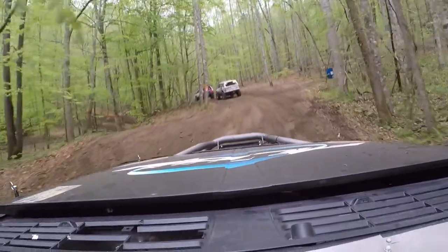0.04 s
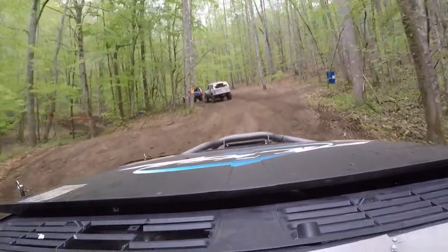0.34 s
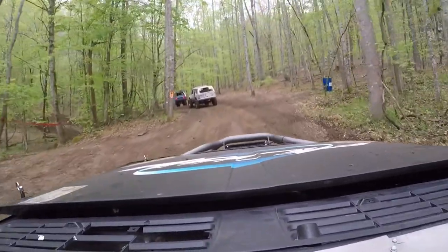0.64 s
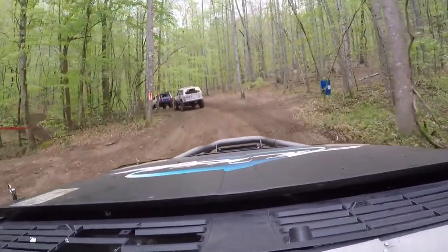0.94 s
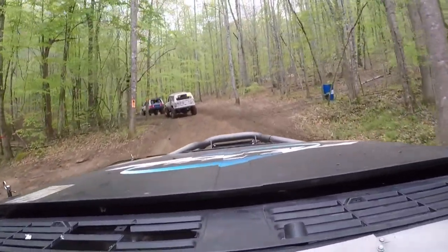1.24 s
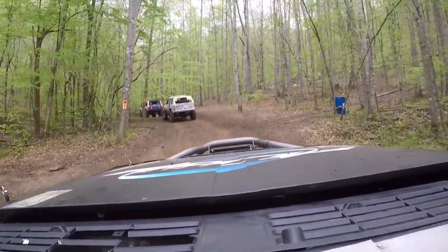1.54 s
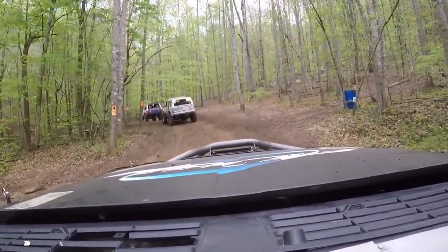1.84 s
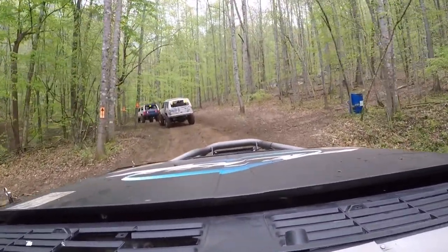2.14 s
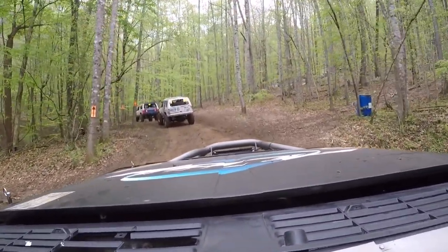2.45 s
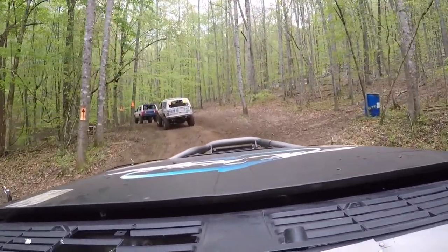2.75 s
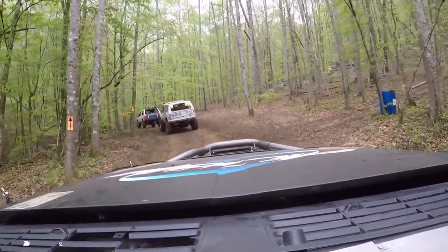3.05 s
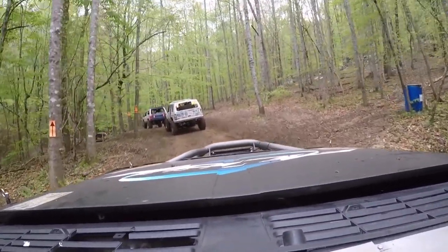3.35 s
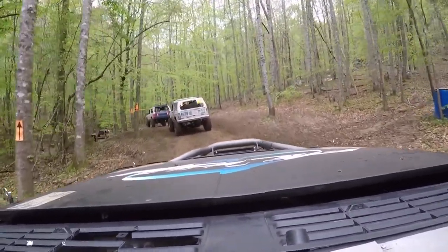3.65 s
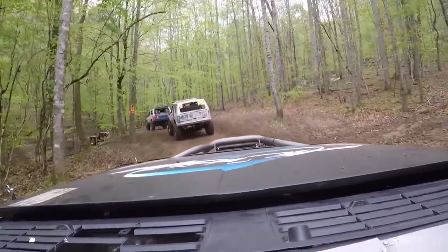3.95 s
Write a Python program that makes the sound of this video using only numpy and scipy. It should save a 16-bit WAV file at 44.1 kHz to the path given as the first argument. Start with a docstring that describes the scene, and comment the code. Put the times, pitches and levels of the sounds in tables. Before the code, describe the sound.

An off-road vehicle's engine drones and rumbles, heard from on board on a dirt trail. It eases almost to idle, then revs up sharply and keeps pulling, with faint tyre hiss, a few light rattles and low bumps.

```python
"""Off-road vehicle on a dirt trail

A six-cylinder engine, heard from the vehicle's own body, drones, sags almost to idle, then revs
and pulls. Its periodic firing gives a harmonic series that booms in the resonant bodywork, while
irregular combustion and rough ground add a rumble. Above these lie the hiss of engine bay and
tyres, a rasp of intake, a faint whine, a few rattles and one suspension thud."""
import sys
import numpy as np
from scipy import signal
from scipy.fft import rfft, irfft
from scipy.io import wavfile
from scipy.ndimage import uniform_filter1d

SR = 44100
rng = np.random.default_rng(int(sys.argv[2]) if len(sys.argv) > 2 else 0)


def bounce(signal):
    """Save signal as a 16-bit WAV file at the path given by the first command-line argument."""
    frames = np.transpose(np.atleast_2d(signal))
    limited = np.clip(frames, -1, 1)
    pcm = np.round(limited * 32767).astype(np.int16)
    wavfile.write(sys.argv[1], SR, pcm)


N = 176400

# Engine speed: time_s, firing_hz
FIRING_RATE = [(0, 65.44), (.2, 67.43), (.53, 63.6), (.78, 66.5), (1, 67.23), (1.25, 63.4), (1.5, 57.72),
               (1.7, 54.05), (1.85, 51.63), (2.08, 53.61), (2.3, 51.93), (2.43, 50.8), (2.5, 58.26),
               (2.6, 83.18), (2.66, 99.9), (2.76, 105.8), (3.03, 111.2), (3.15, 105.8), (3.3, 98.5),
               (3.78, 100.9), (3.92, 97.5), (4, 93.5)]
# Firing harmonics 1 to 4, each booming and fading: time_s, level_db
HARMONIC_1 = [(0, -22.5), (.55, -24.5), (1, -23.5), (1.45, -22), (1.65, -29.5), (2.16, -33), (2.24, -22),
              (2.48, -24), (2.68, -19.5), (2.85, -26), (3.02, -20.5), (3.15, -35), (4, -31)]
HARMONIC_2 = [(0, -18.5), (1.1, -18.5), (1.502, -19), (1.8, -26.5), (2.1, -21.5), (2.3, -24.5), (2.66, -22),
              (3.15, -20.5), (3.33, -32), (3.75, -31), (4, -32)]
HARMONIC_3 = [(0, -30), (.3, -30), (.53, -42), (.72, -32), (1, -31), (1.35, -46), (1.52, -31), (1.66, -31),
              (1.8, -22), (2.4, -22.5), (2.55, -40), (3, -52), (3.4, -38), (3.88, -31), (4, -41)]
HARMONIC_4 = [(1.33, -62), (1.43, -37), (1.53, -24.5), (1.85, -31), (2.4, -31.5), (2.6, -51.5)]
# Orders of unequal cylinders under load, ahead of the muffler: crank_order, level_db
UNEVEN_ORDERS = [(2, -43), (4, -33), (5, -32.5), (7, -32), (7.5, -35), (8, -38), (10, -38)]
# Spectra of exhaust rumble and bodywork boom: frequency_hz, relative_db
RUMBLE_SPECTRUM = [(10, -22), (28, -6.5), (50, -0.5), (80, -6), (120, -7.5), (158, -1.5), (188, -8),
                   (225, -7), (255, -15), (290, -21.5), (400, -29)]
BOOM_SPECTRUM = [(70, -32), (92, -10.5), (106, -7.5), (128, 1.5), (142, -0.5), (156, -15.5), (200, -36.5)]
# Envelopes of rumble, boom, intake rasp and intake whistle: time_s, level_db
RUMBLE_ENVELOPE = [(0, -25.5), (.6, -29), (1.3, -33), (2.05, -33), (2.5, -27), (2.9, -30.5), (3.55, -32),
                   (3.97, -23)]
BOOM_ENVELOPE = [(1.4, -40), (1.65, -27.5), (2.35, -29), (2.53, -22), (2.7, -22), (3.1, -25.5), (3.48, -28),
                 (4, -24.5)]
RASP_ENVELOPE = [(2.47, -62), (2.64, -43.5), (2.8, -44), (2.96, -41.5), (3.22, -54), (3.8, -50)]
WHISTLE_ENVELOPE = [(1.6, -61), (2.9, -56.5), (3.6, -49), (4, -48.5)]
# Envelopes of the three hiss bands: time_s, mids_db, upper_mids_db, treble_db
HISS_ENVELOPES = [(0.1, -45.5, -46, -70), (1.67, -44.5, -47, -66), (1.9, -42, -45, -63),
                  (2.4, -43, -44, -59.5), (2.56, -35.5, -42.5, -58), (2.68, -40, -44.5, -59.5),
                  (3.26, -42.5, -45, -64), (3.84, -39.5, -40, -60)]
# Spectra of those bands: frequency_hz, relative_db
HISS_MIDS = [(200, -8.5), (300, -2), (600, -1.5), (800, -3.5), (1300, -3.5), (1600, -11.5), (2500, -27)]
HISS_UPPER_MIDS = [(800, -17.5), (1500, -1.5), (2400, -1.5), (3200, -6.5), (4000, -10), (5000, -14.5),
                   (6100, -12), (6600, -23), (7200, -37), (9000, -54.5)]
HISS_TREBLE = [(5000, -1.5), (6500, 10), (7600, 0.5), (9000, -1.5), (10300, -6.5), (11500, -14),
               (13000, -38.5)]
# Drive whine: time_s, pitch_hz, level_db
DRIVE_WHINE = [(0, 492, -57.5), (1.8, 494, -54), (2.03, 523, -46.5), (2.2, 530, -47), (2.6, 530, -46),
               (2.8, 546, -52), (4, 538.5, -59.5)]
# Short rattles of loose fittings and one longer, low suspension thud:
# start_s, ring_hz, width_octaves, level_db, decay_s
RATTLES_AND_THUD = [(.232, 3200, .6, -43, .007), (.233, 6250, .07, -46, .007), (.252, 6300, .07, -51, .007),
                    (.27, 430, .7, -45, .2), (.595, 2250, .55, -39, .012), (2.548, 2100, .4, -35, .013),
                    (2.549, 6250, .1, -43.5, .016), (2.59, 1600, .2, -35, .018)]
# Booms as the wheels roll over bumps: peak_s, pitch_hz, level_db
BUMP_BOOMS = [(2.55, 138, -19), (3.375, 127, -22), (3.58, 127, -19), (3.715, 113, -21), (3.79, 133, -20)]
# Panel resonances: centre_hz, lift_db
PANEL_MODES = [(380, 4), (484, 3), (690, 3.5), (778, 7.5), (970, 4.5), (1295, 2), (1520, 1), (2110, 4),
               (2390, 2), (2545, 1.5), (2920, 4), (3450, 1.5), (3800, 2)]

BODY_MODES_HZ, BODY_WIDTH_HZ, PANEL_Q = (120, 143, 180, 213), 5, 29
FIRINGS_PER_TURN = 3
TIME_S = np.arange(N) / SR


def amp(db):
    """Amplitude ratio of a level in decibels."""
    return 10 ** (np.asarray(db) / 20)


def unit(x):
    """Normalisation to rms 1."""
    return x / np.sqrt(np.mean(x ** 2) + 1e-20)


def bell(x, centre, width):
    """Gaussian of height 1, falling to 1/e one width from its centre."""
    return np.exp(-((x - centre) / width) ** 2)


def curve(table, column=1):
    """Linear interpolation of a time table at every sample."""
    rows = np.array(table)
    return np.interp(TIME_S, rows[:, 0], rows[:, column])


def drift(rate_hz):
    """Low-pass Gaussian noise: slow random motion of rms 1."""
    frames = N // 32 + 2
    hz = np.fft.rfftfreq(frames, N / SR / frames)
    slow = irfft(rfft(rng.standard_normal(frames)) * bell(hz, 0, rate_hz), frames)
    return unit(np.interp(np.arange(N), np.linspace(0, N, frames), slow))


def tone(turns, waver, rate_hz):
    """Random amplitude and phase modulation broadens a partial of rms 1."""
    wobble = 1 + waver * (drift(rate_hz) + 1j * drift(rate_hz))
    return unit((wobble * np.exp(2j * np.pi * turns)).real)


def panel_db(hz):
    """Resonance: each panel mode lifts the frequencies near its own."""
    return sum(lift / (1 + (2 * PANEL_Q * (hz / centre - 1)) ** 2) for centre, lift in PANEL_MODES)


def body_lag(hz):
    """Phase lag in turns: a tone rising through a body resonance falls half a turn behind."""
    return sum(1 + np.tanh((hz - mode) / BODY_WIDTH_HZ) for mode in BODY_MODES_HZ) / 4


def noise(spectrum):
    """Source and filter: white noise shaped by a spectrum and the panel modes, at rms 1."""
    hz = np.fft.rfftfreq(N, 1 / SR) + 1
    points_hz, points_db = np.transpose(spectrum)
    shape_db = np.interp(np.log(hz), np.log(points_hz), points_db) + panel_db(hz)
    rolloff = np.minimum(points_hz[-1] / hz, 1) ** 2
    return unit(irfft(rfft(rng.standard_normal(N)) * amp(shape_db) * rolloff, N))


def hiss(firings):
    """Broadband engine-bay and tyre noise flickers, amplitude-modulated a little by each firing."""
    bands = enumerate([HISS_MIDS, HISS_UPPER_MIDS, HISS_TREBLE], 1)
    wash = sum(amp(curve(HISS_ENVELOPES, column)) * noise(shape) for column, shape in bands)
    pulsing = unit(1 + 0.06 * np.cos(2 * np.pi * firings))
    flicker_db = 0.61 * drift(rate_hz=40)
    return wash * pulsing * amp(flicker_db)


def drive_whine():
    """A thin, unsteady partial from the drive; its phase is the integral of its pitch."""
    turns = np.cumsum(curve(DRIVE_WHINE)) / SR
    return amp(curve(DRIVE_WHINE, column=2)) * tone(turns, waver=.45, rate_hz=18)


def intake_whistle(pitch_hz=2346):
    """Narrow-band noise: a breathy intake whistle that grows as the engine pulls."""
    return amp(curve(WHISTLE_ENVELOPE)) * tone(pitch_hz * TIME_S, waver=3, rate_hz=70)


def belt_whirr(pitch_hz=2066, level_db=-52):
    """A belt or bearing whirrs briefly; deep modulation spreads its tone into a band."""
    swell = bell(TIME_S, centre=1.07, width=0.26)
    return amp(level_db) * swell * tone(pitch_hz * TIME_S, waver=3, rate_hz=170)


def rattles_and_thud(skirt_db=-28, rise_s=.002):
    """Damped vibration: short rattles and a longer, low suspension thud decay as bands of noise."""
    out, hz = np.zeros(N), np.fft.rfftfreq(N, 1 / SR) + 1
    for start_s, ring_hz, width, level_db, decay_s in RATTLES_AND_THUD:
        age_s = np.maximum(TIME_S - start_s, 0)
        octaves = np.log2(hz / ring_hz)
        colour = bell(octaves, 0, width) + amp(skirt_db) * np.exp(-2 * octaves ** 2)
        band = unit(irfft(rfft(rng.standard_normal(N)) * colour, N))
        out += amp(level_db) * np.minimum(age_s / rise_s, 1) * np.exp(-age_s / decay_s) * band
    return out


def bumps(swell_s=.042):
    """Transient excitation: each bump swells and fades as one low boom of the bodywork."""
    out = np.zeros(N)
    for peak_s, pitch_hz, level_db in BUMP_BOOMS:
        boom = unit(np.sin(2 * np.pi * (pitch_hz * TIME_S + rng.random())))
        out += amp(level_db) * bell(TIME_S, peak_s, swell_s) * boom
    return out


def rumble():
    """Random forcing: irregular combustion and rough ground shake the bodywork."""
    exhaust_noise = amp(curve(RUMBLE_ENVELOPE)) * noise(RUMBLE_SPECTRUM)
    body_boom = amp(curve(BOOM_ENVELOPE)) * noise(BOOM_SPECTRUM)
    return exhaust_noise + body_boom


def panel_hum(firings, mode_hz=482, width_hz=28, level_db=-52.5):
    """Sympathetic vibration: a panel hums whenever a firing overtone crosses its resonance."""
    hum = np.zeros(N)
    for harmonic in range(5, 11):
        response = bell(harmonic * curve(FIRING_RATE), mode_hz, width_hz)
        hum += response * tone(harmonic * firings, waver=.45, rate_hz=12)
    return amp(level_db) * hum


def intake_rasp(firings, formant_hz=950, width_octaves=.7):
    """Formant filtering: high crank orders sweep a broad intake resonance and flare at panel modes."""
    crank_hz, rasp = curve(FIRING_RATE) / FIRINGS_PER_TURN, np.zeros(N)
    for order in range(15, 42):
        hz = order * crank_hz
        gain = bell(np.log2(hz), np.log2(formant_hz), width_octaves) * amp(panel_db(hz))
        turns = order * firings / FIRINGS_PER_TURN + rng.random()
        rasp += gain * tone(turns, waver=0.66, rate_hz=8)
    return amp(curve(RASP_ENVELOPE)) * unit(rasp)


def uneven_cylinders(firings, load_onset_s=(3.1, 3.3), pipe_hz=219, pipe_width_hz=14, muffler_hz=232):
    """Unequal cylinders lengthen the period, adding orders between and below the firing harmonics."""
    load = np.interp(TIME_S, load_onset_s, [0, 1])
    crank_hz, orders = curve(FIRING_RATE) / FIRINGS_PER_TURN, np.zeros(N)
    for order, loaded_db in UNEVEN_ORDERS:
        hz = order * crank_hz
        unloaded_db = -45 + 12 * bell(hz, pipe_hz, pipe_width_hz)  # exhaust-pipe resonance
        level_db = unloaded_db + (loaded_db - unloaded_db) * load
        muffler = 1 / np.sqrt(1 + (hz / muffler_hz) ** 20)
        turns = order * firings / FIRINGS_PER_TURN + rng.random()
        orders += muffler * amp(level_db) * tone(turns, waver=.25, rate_hz=2.1)
    return orders


def exhaust_drone(firings):
    """Periodic firing gives a harmonic series; phase lag in the body reshapes the chug with speed."""
    drone = np.zeros(N)
    for harmonic, envelope in enumerate([HARMONIC_1, HARMONIC_2, HARMONIC_3, HARMONIC_4], 1):
        turns = harmonic * firings - body_lag(harmonic * curve(FIRING_RATE))
        drone += amp(curve(envelope)) * tone(turns, waver=.05, rate_hz=43)
    return drone


def scene(speed_jitter=.0015, fade_s=.002):
    """Superposition of all sources; one firing phase drives the engine tones and the hiss pulses."""
    firing_hz = curve(FIRING_RATE) * (1 + speed_jitter * drift(rate_hz=6.6))
    firings = np.cumsum(firing_hz) / SR
    mix = exhaust_drone(firings) + uneven_cylinders(firings) + panel_hum(firings) + intake_rasp(firings)
    mix += rumble() + bumps() + hiss(firings)
    mix += drive_whine() + intake_whistle() + belt_whirr() + rattles_and_thud()
    return (mix * signal.windows.tukey(N, 2 * fade_s * SR / N))[None]


def record(dry):
    """Dynamic range compression: a quick limiter holds down bass peaks, then a low-pass cuts the top."""
    split_hz, threshold_db, window_s, cutoff_hz = 380, -16.5, .024, 15700
    bass = signal.sosfiltfilt(signal.butter(N=4, Wn=split_hz, fs=SR, output="sos"), dry)
    window = int(window_s * SR)
    bass_db = 10 * np.log10(abs(uniform_filter1d(bass ** 2, window)) + 1e-12)
    excess_db = uniform_filter1d(np.maximum(bass_db - threshold_db, 0), window)
    held = dry - bass + bass * amp(-.7 * excess_db)
    lowpass = signal.firwin(511, cutoff_hz, window=("kaiser", 9), fs=SR)
    return signal.oaconvolve(held, lowpass[None], "same")


dry = scene()
out = record(dry)
bounce(out)
```